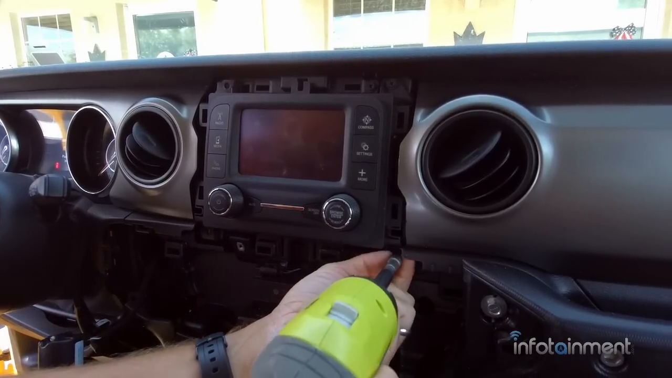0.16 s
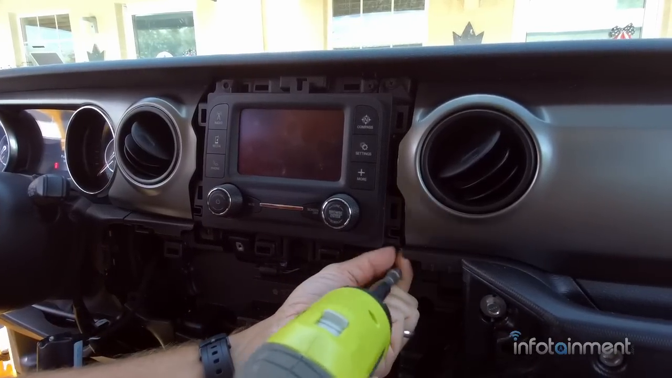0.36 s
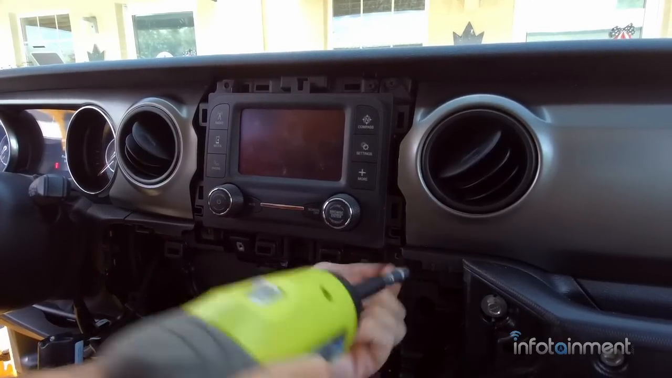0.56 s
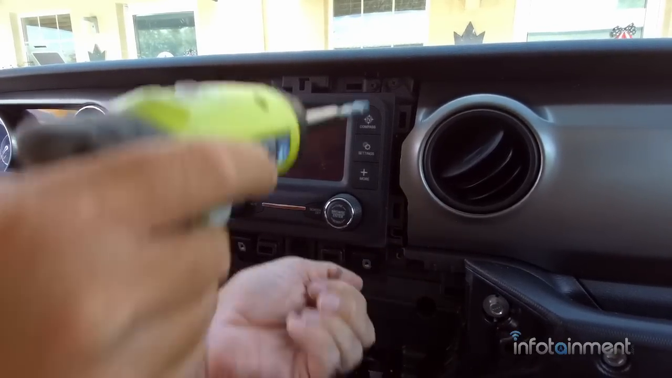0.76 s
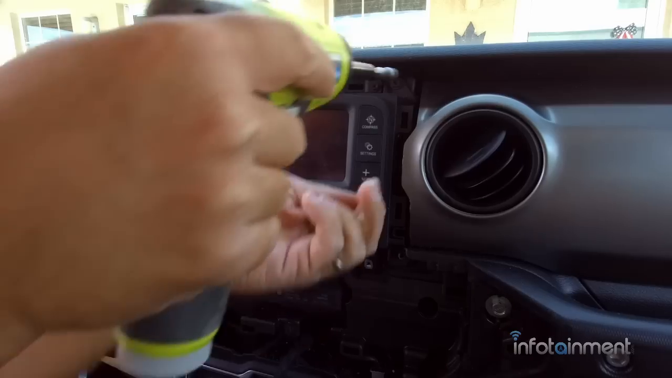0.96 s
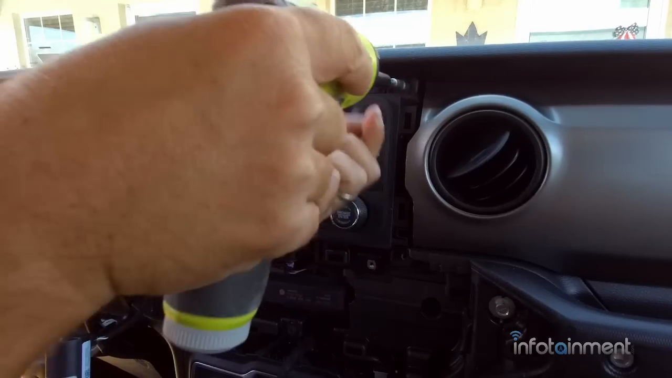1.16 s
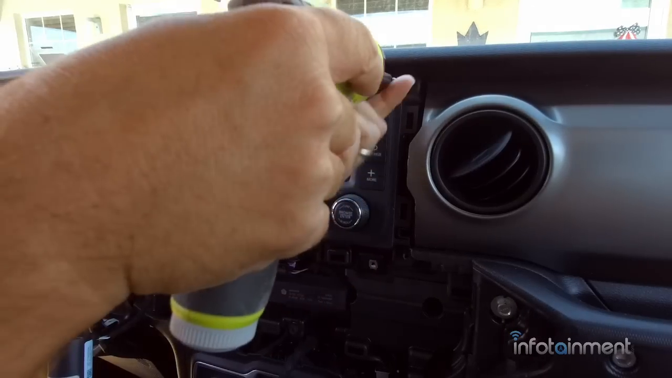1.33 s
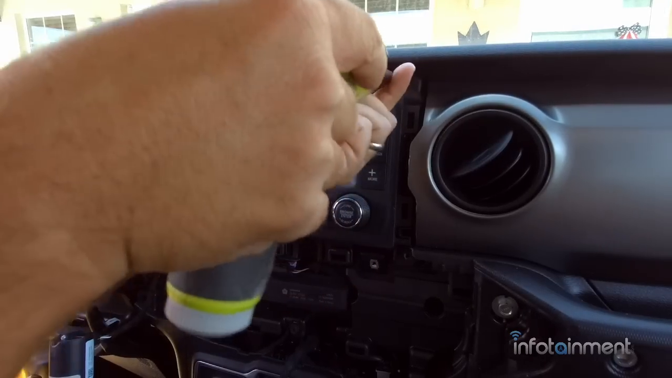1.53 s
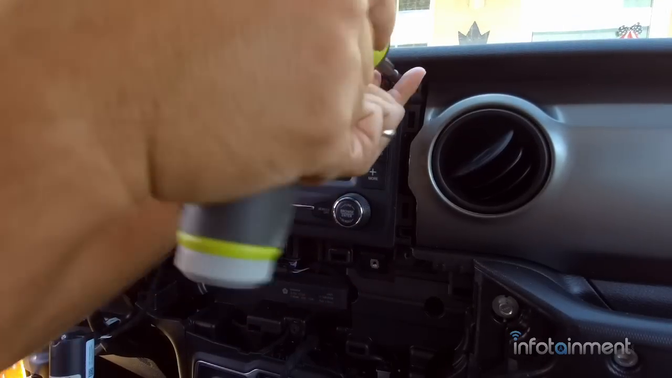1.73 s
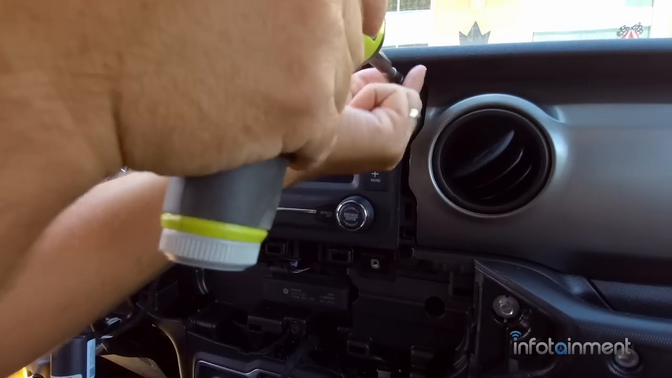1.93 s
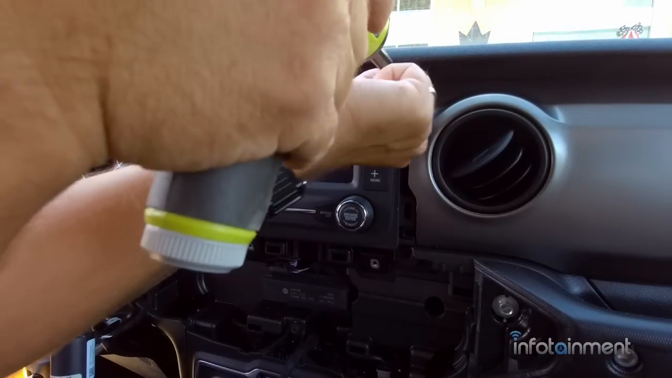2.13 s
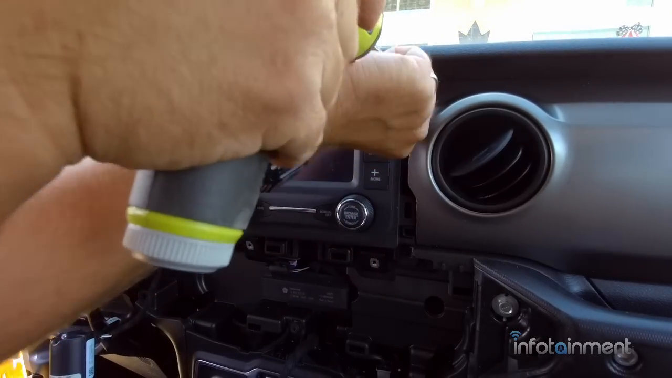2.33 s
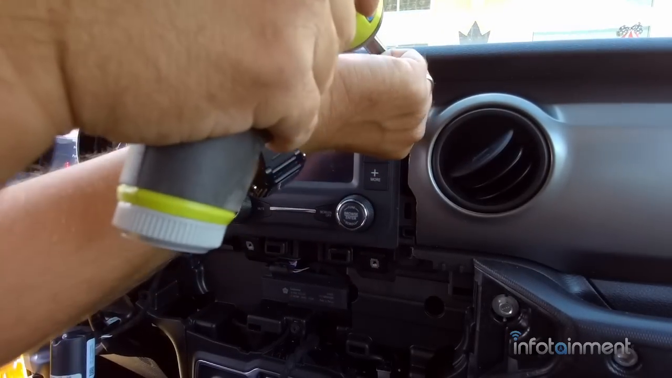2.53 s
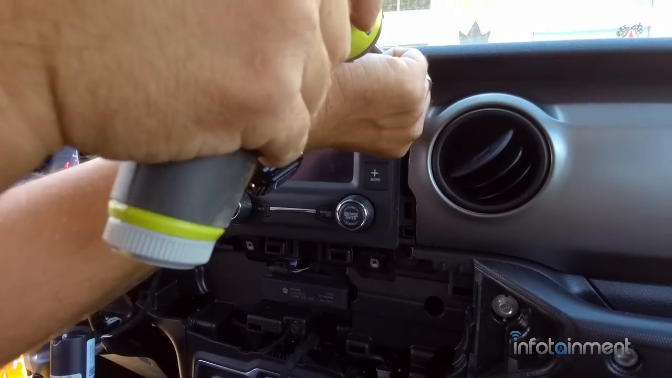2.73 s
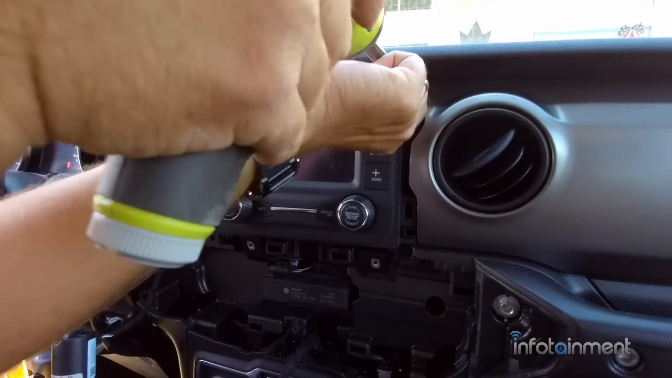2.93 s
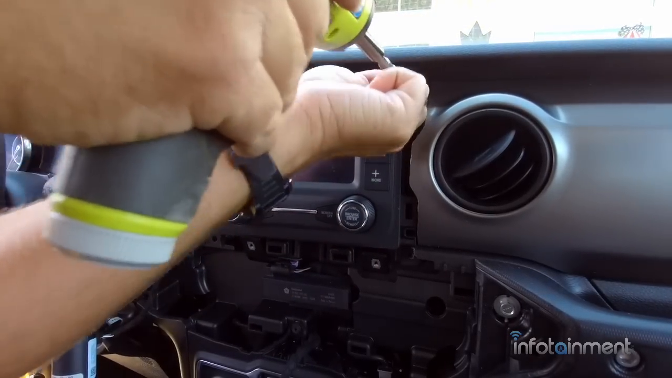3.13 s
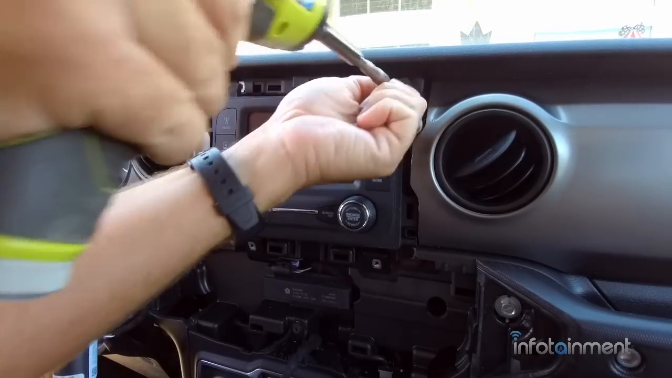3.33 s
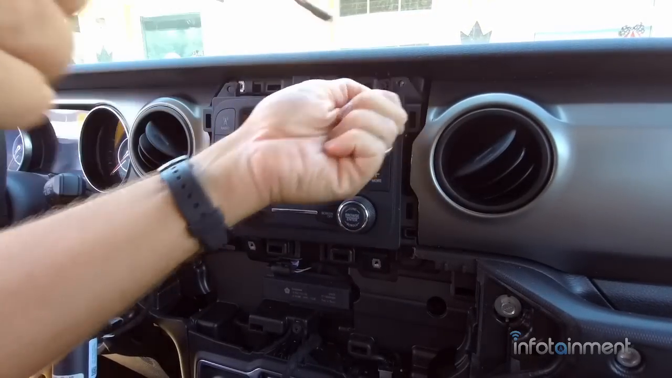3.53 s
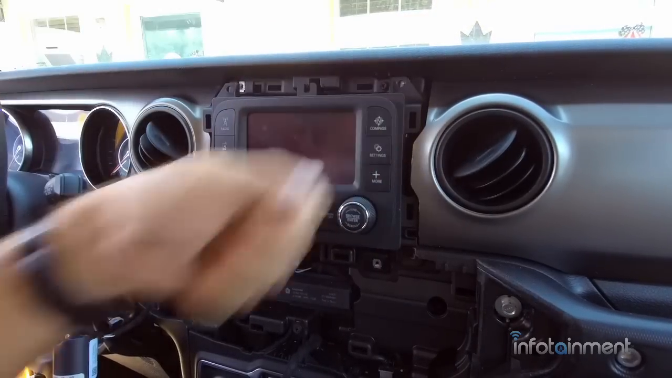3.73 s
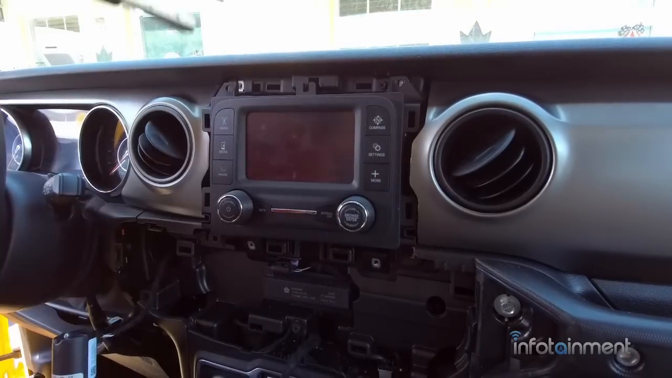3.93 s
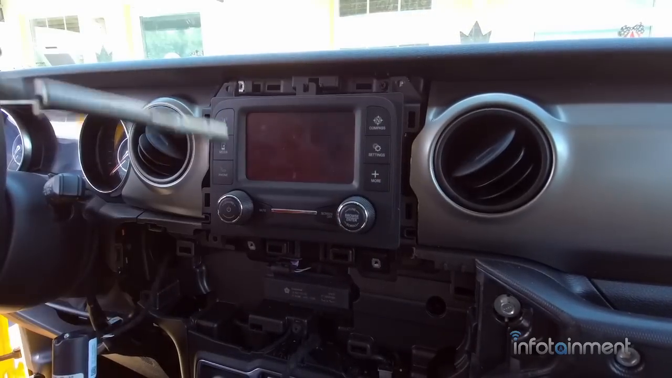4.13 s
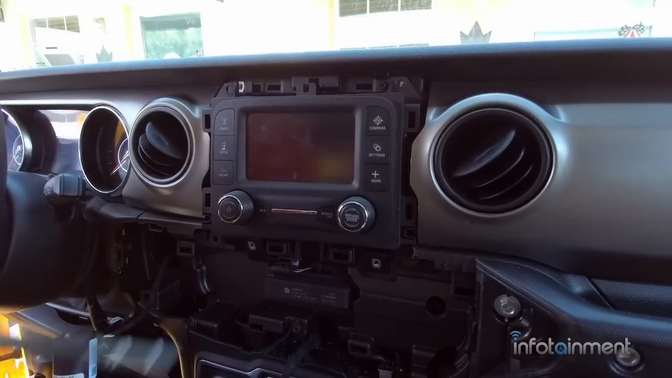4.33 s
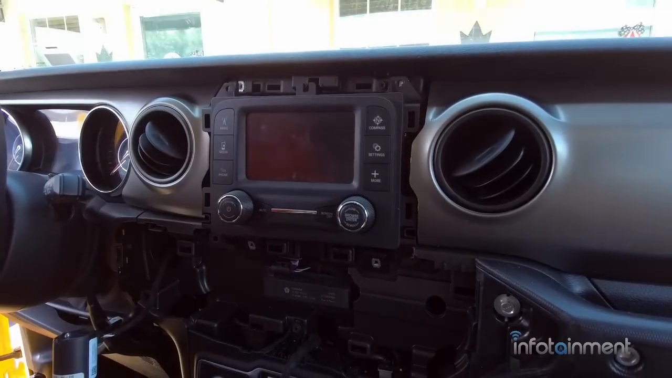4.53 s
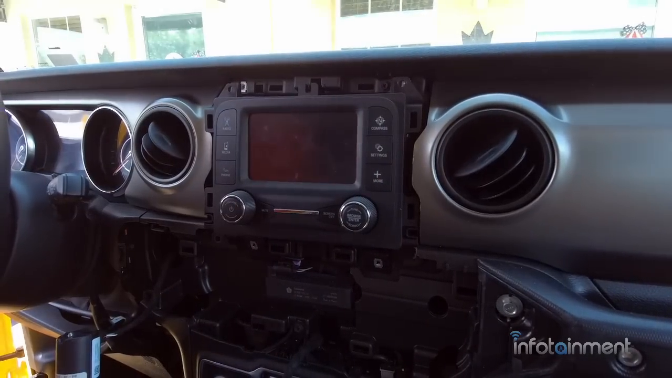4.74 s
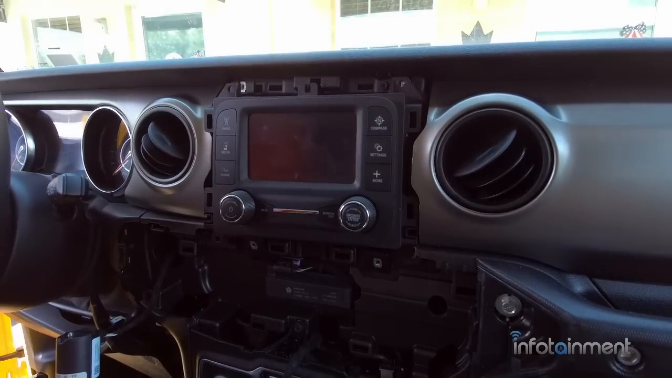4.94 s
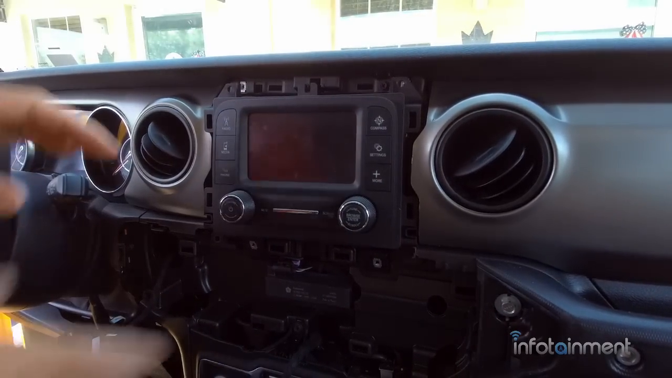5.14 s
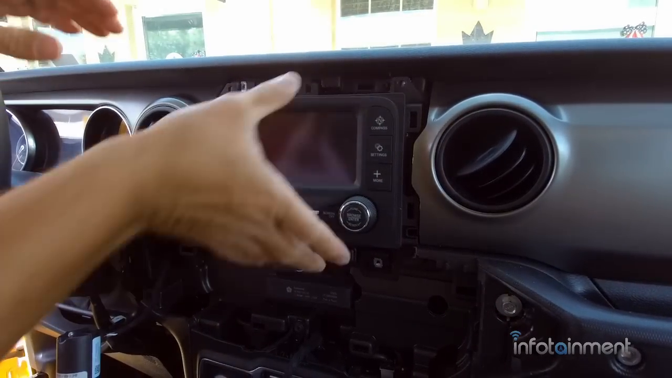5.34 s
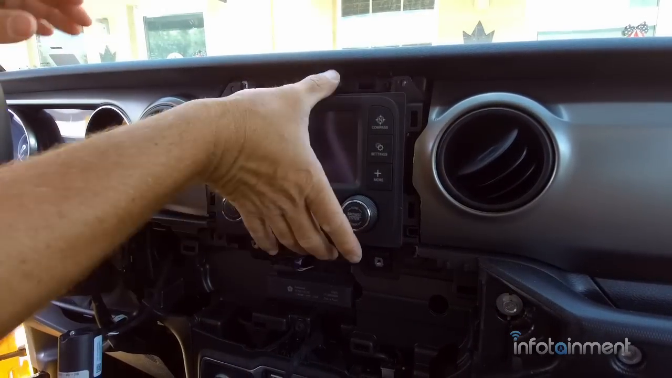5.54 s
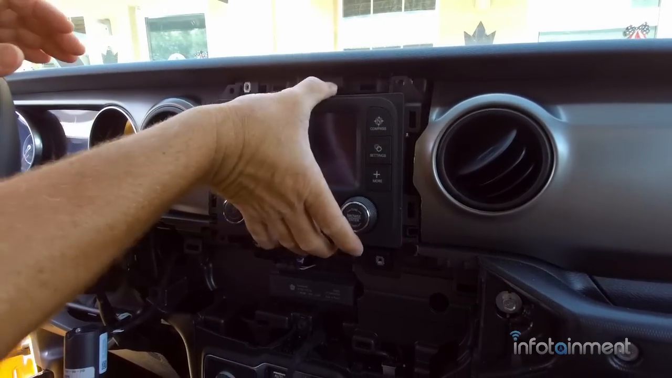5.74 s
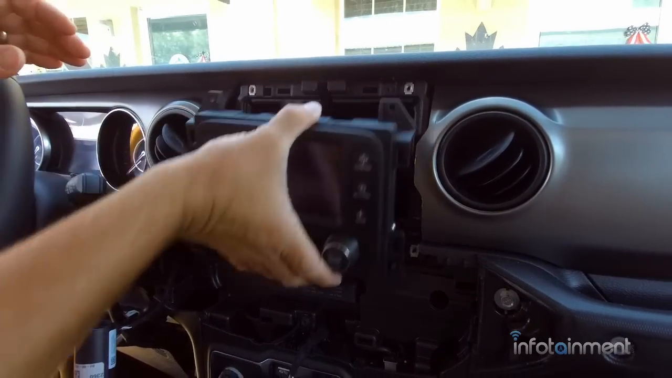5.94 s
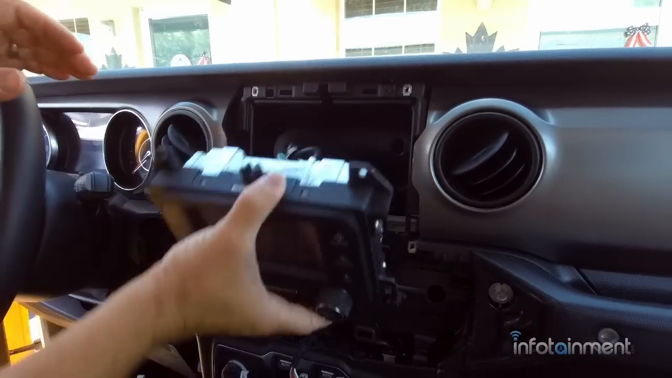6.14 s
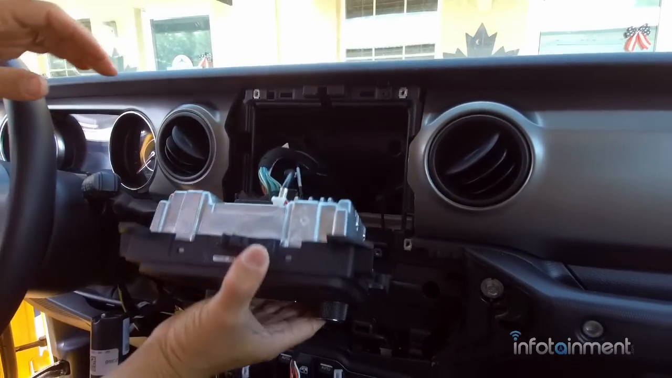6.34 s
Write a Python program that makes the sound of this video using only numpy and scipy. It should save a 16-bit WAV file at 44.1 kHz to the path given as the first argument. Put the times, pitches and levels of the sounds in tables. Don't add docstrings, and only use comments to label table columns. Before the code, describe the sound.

Two gritty bursts of a small electric screwdriver, sharp taps on a dashboard, loose screws bouncing in a plastic cup, then faint bumps and cloth rustle.

```python
import sys
import numpy as np
from scipy import signal
from scipy.fft import rfft, irfft
from scipy.io import wavfile

SR = 44100
rng = np.random.default_rng(int(sys.argv[2]) if len(sys.argv) > 2 else 0)


def materialize(psi):
    bounded = np.clip(np.atleast_2d(psi).T, -1, 1)
    quanta = np.round(bounded * 32767).astype(np.int16)
    wavfile.write(sys.argv[1], SR, quanta)


def boost_factor(decibels):
    exponent = np.asarray(decibels, float) / 20
    return 10 ** exponent


N = 281799


def evened(x):
    return x / np.sqrt(np.mean(x ** 2) + 1e-20)


def peaked(x):
    return x / abs(x).max()


def white(count):
    return rng.standard_normal(count)


def curves(rows):
    s, *columns = np.transpose(rows)
    t = np.arange(s[0], s[-1], 1 / SR)
    return [t] + [np.interp(t, s, c) for c in columns]


def add(mix, s, sound):
    part = mix[round(s * SR):][:len(sound)]
    part += sound[:len(part)]


def band(x, lo_hz, hi_hz):
    sos = signal.butter(3, [lo_hz, min(hi_hz, 16000)], "band", fs=SR, output="sos")
    return signal.sosfilt(sos, x)


def coloured(x, points, peaks=()):
    f, db = np.transpose(points)
    hz = np.fft.rfftfreq(len(x), 1 / SR)
    lift_db = sum(top_db / (1 + (2 * (hz - centre) / width) ** 2) for centre, width, top_db in peaks)
    base_db = np.interp(np.log(hz + 1), np.log(f), db, -90, -90)
    return evened(irfft(rfft(x) * boost_factor(base_db + lift_db), len(x)))


def drift(count, hz):
    return evened(signal.sosfilt(signal.butter(2, hz, fs=SR, output="sos"), white(count)))


def ramp(t, start, length):
    return np.clip((t - start) / length, 0, 1)


def hump(t, middle, length):
    return np.cos(np.pi * np.clip((t - middle) / length, -.5, .5)) ** 2


def ring(modes, factor=1, slower=1):
    t = np.arange(SR // 8) / SR
    x = np.zeros(len(t))
    for hz, db, t60 in modes:
        fade_db = -60 * t / (np.clip(t60, .02, .1) * slower)
        x += boost_factor(db + fade_db) * np.sin(2 * np.pi * hz * factor * t)
    return peaked(x)


def crack(lo_hz, hi_hz, t60, rise=0.0002):
    t = np.arange(SR // 8) / SR
    shape = np.minimum(t / rise, 1) ** 2 * boost_factor(-60 * np.maximum(t - rise, 0) / t60)
    return peaked(band(white(len(t)), lo_hz, hi_hz) * shape)


# pitch_hz, level_db
HUSH = [(18, -77), (30, -56), (60, -43), (100, -49), (125, -17.5), (202, -22.5), (230, -4), (270, -17.5),
        (467, -8.5), (505, -9.5), (709, -7), (767, -10), (1770, -16), (9430, -37), (15500, -33)]
# pitch_hz, width_hz, level_db
HUSH_BANDS = [(4500, 700, 5), (7900, 700, 4), (9450, 400, 4), (10800, 600, 3)]


def hush():
    return coloured(white(N), HUSH, HUSH_BANDS) * boost_factor(-60.5 + drift(N, 38))


# pitch_hz, level_db
HUM = [(236.9, -73), (463.0, -68.5), (543.7, -68)]


def outside_hum():
    mix = np.zeros(N)
    for hz, db in HUM:
        level = boost_factor(db - 3.5 + 3 * drift(N, 8))
        mix += level * np.sin(2 * np.pi * hz * np.cumsum(1 + 0.0057 * drift(N, 3.76)) / SR)
    return mix


# start_s, length_s, pitch_hz, level_db
SQUEAKS = [(3.825, .17, 9500, -78), (5.96, .09, 9500, -75), (4.65, 1.1, 2606, -79),
           (1.526, .026, 3200, -60), (3.89, .05, 6550, -77), (3.9, .05, 9550, -73)]


def squeaks():
    mix = np.zeros(N)
    for s, length, hz, db in SQUEAKS:
        count = len(np.arange(0, length, 1 / SR))
        waver = np.cumsum(1 + .004 * drift(count, 60)) / SR
        level = boost_factor(db + 3 * drift(count, 40)) * np.hanning(count) ** .5
        add(mix, s, level * np.sin(2 * np.pi * hz * waver))
    return mix


# peak_s, level_db
GRIPS = [(.3, -74.5), (1.24, -73), (1.58, -73), (1.815, -59), (2.08, -65.5), (2.38, -63), (2.55, -72),
         (2.78, -74), (3.2, -72), (4.16, -72), (4.4, -70), (5.71, -82)]


def grip_rumble():
    t = np.arange(N) / SR
    rumble_db = np.full(N, -95.0)
    for s, db in GRIPS:
        rumble_db = np.maximum(rumble_db, db - np.maximum(700 * (s - t), 60 * (t - s)))
    deep = [(25, -30), (45, -23), (63, -5), (90, -13), (140, -10.5), (280, -8)]  # Hz, dB
    return coloured(white(N), deep) * boost_factor(rumble_db)


# pitch_hz, level_db
RUSTLE = [(500, -30), (900, -8), (1300, -3), (2500, -3), (4900, -6), (9000, -12), (15500, -19)]
# middle_s, length_s, hiss_db, brush_db
SWEEPS = [(1.518, 0.36, -66, -62), (1.758, 0.32, -60, -81), (3.4, 0.9, -64, -75.5), (4.192, 0.31, -60, -63),
          (4.537, 0.22, -65, -51.5), (4.61, 0.073, -47, -71), (4.786, 0.58, -52.5, -61.5),
          (4.898, 0.12, -56, -59), (5.09, 0.51, -58.5, -63.5), (5.76, 0.24, -62.5, -64),
          (6.053, 0.71, -62, -64.5)]


def sleeve():
    t = np.arange(N) / SR
    hiss_power, brush_power = boost_factor(2 * -67.5), boost_factor(2 * -66.5)
    for s, length, hiss_db, brush_db in SWEEPS:
        swell = hump(t, s, length)
        hiss_power = hiss_power + boost_factor(2 * hiss_db) * swell
        brush_power = brush_power + boost_factor(2 * brush_db) * swell
    grains = white(N) * boost_factor(drift(N, 80))
    hiss = boost_factor(-6) * np.sqrt(hiss_power) * coloured(grains, RUSTLE)
    return hiss + np.sqrt(brush_power) * evened(band(grains, 295, 1280))


def reflections(x):
    at = np.arange(90, SR // 6, 20)
    taps = np.zeros(SR // 5)
    cabin_t60 = 0.069
    signs = rng.choice([-1., 1.], len(at))
    taps[at + rng.integers(0, 20, len(at))] = signs * boost_factor(-60 * at / SR / cabin_t60)
    return signal.oaconvolve(x, taps / np.linalg.norm(taps))[:N]


# start_s, peak_db, centre_hz
TICKS = [(1.059, -44.5, 9100), (1.0984, -55, 14000), (1.1662, -52, 8670), (3.155, -45.5, 6350),
         (3.1994, -61, 5380), (3.553, -55, 12000), (4.0232, -43, 9200), (4.0265, -54, 6800),
         (4.0538, -46, 7950), (4.0851, -56, 13500), (4.126, -46, 9400), (4.146, -50, 12000),
         (4.159, -44, 8450), (4.204, -57, 12000), (4.213, -46, 12000), (4.226, -52, 13500),
         (4.269, -44, 13000), (4.2877, -49, 11000), (4.292, -44.5, 8200), (4.3017, -53, 13500),
         (4.4024, -50, 9000)]


def loose_screws():
    mix = np.zeros(N)
    for s, db, hz in TICKS:
        add(mix, s, boost_factor(db) * crack(.5 * hz, 1.8 * hz, .014))
    return mix


# pitch_hz, level_db, t60_s
DASH = [
    [(265, -1, .09), (420, -4, .06), (590, -8, .05), (690, 0, .06), (850, -3, .05)],
    [(1050, -2, .05), (1260, 0, .045), (1520, -1, .045), (1800, -2, .04), (2080, -3, .04), (2500, -6, .04), (2990, -6, .045), (3420, -8, .04), (4300, -9, .04)],
]


def tap(s, db, thud_db, tick_db, t60, hz, rise):
    contacts = crack(400, 6000, .4 * t60, rise)[:1400]
    low, middle = (peaked(signal.oaconvolve(ring(modes, 1, t60 / 0.11), contacts)) for modes in DASH)
    middle = peaked(middle + 1.4 * band(middle, .7 * hz, 1.4 * hz))
    add(middle, 0, 0.4 * crack(0.41 * hz, 2.57 * hz, t60, rise))
    add(middle, 0, 1.6 * boost_factor(tick_db) * crack(4200, 10500, .6 * t60, .25 * rise))
    add(middle, 0, .7 * boost_factor(tick_db) * crack(10000, 16000, .25 * t60, .25 * rise))
    add(low, 0, 0.62 * crack(380, 1600, t60, rise) + .14 * crack(220, 490, 1.6 * t60, 0.0022))
    return s, boost_factor(db - 3.5) * (middle + 1.03 * boost_factor(thud_db) * low)


# start_s, peak_db, thud_below_db, t60_s, centre_hz
SCUFFS = [(1.3747, -45.5, -8.5, 0.12, 1510), (1.45, -38.5, -14, 0.06, 1300), (1.522, -34, -5, 0.12, 1030),
          (1.6344, -42.5, -11, 0.067, 1540), (3.6094, -46, -2, 0.16, 1080), (3.907, -50.5, 4, 0.12, 1640),
          (4.8244, -47, 0, 0.085, 2050), (4.9138, -38, -17, .069, 2020), (5.7344, -44.5, -10, 0.23, 1920)]


def scuffs():
    mix = np.zeros(N)
    for s, db, thud_db, t60, hz in SCUFFS:
        add(mix, *tap(s, db, thud_db, -32, t60, hz, 0.0069))
    return mix


# start_s, peak_db, thud_below_db, tick_below_db, centre_hz
CATCHES = [(1.781, -35, -21, -17, 1970), (2.365, -26, -4, -15, 1000), (2.405, -30, -15, -16, 1110),
           (2.5, -34, 0, -16, 1110), (2.544, -21.5, -8, -22, 1290), (2.585, -25, -28, -14, 1300),
           (2.612, -21, -21, -20, 1520), (2.635, -23, -13, -30, 1300), (2.748, -24, -3, -19, 1250)]
# start_s, peak_db, thud_below_db, tick_below_db, centre_hz
SEATS = [(0.874, -43.5, -5, -7, 1240), (1.565, -37, 4.5, -15, 1350), (1.714, -34.5, -7, -3.5, 1370),
         (1.494, -25, -26, -22, 1400), (1.742, -40, -21, -12, 1310), (3.02, -39, -21, -4, 2620),
         (3.0866, -44, -10, -15, 1100), (3.39, -45.5, -7, -11, 1540)]
# start_s, peak_db, thud_below_db, tick_below_db, centre_hz
BUMPS = [(4.8775, -40, -10, -17, 1480), (4.9874, -44, -15, -23, 2300), (5.074, -37, -12, -16, 1500),
         (5.976, -51, 5, -20, 900)]


def taps():
    mix = np.zeros(N)
    for t60, rise, table in ((.085, .0063, CATCHES), (.06, .0016, SEATS), (.039, .0016, BUMPS)):
        for s, db, thud_db, tick_db, hz in table:
            longer_t60 = max(t60 + 0.3 * (db + 13.5), .02)
            add(mix, *tap(s, db, thud_db, tick_db, longer_t60, hz, rise))
    return mix


# start_s, peak_db, swell_s, t60_s, tick_below_db
STRIKES = [(.268, -23, 0.0045, 0.039, -16), (1.2383, -26, 0.0015, 0.042, -40),
           (1.473, -15.5, 0.0024, 0.043, -17.5), (1.541, -26.5, .011, 0.027, -38),
           (1.803, -9.5, 0.0037, 0.049, -14), (2.0382, -11, 0.0029, 0.048, -10),
           (4.1429, -35.5, 0.0079, 0.044, -30), (4.158, -36, 0.0033, 0.027, -24),
           (4.261, -35.5, 0.002, 0.023, -20), (4.922, -32.5, 0.0075, 0.028, -25),
           (4.968, -39, 0.0078, 0.051, -30), (5.0374, -32, 0.0017, 0.028, -13),
           (5.0609, -29, 0.00091, 0.027, -14), (6.0077, -47, .002, 0.086, -12)]
# pitch_hz, level_db
DASH_SPOTS = [
    [(750, -2.5), (1300, -4), (1800, -3), (2130, -9), (3200, -21), (4150, -3)],
    [(415, -7.5), (590, -3.5), (840, -5), (1060, -4), (1270, 2), (1480, -2.5), (1950, -8), (2520, -10),
     (3070, -11), (3400, -22)],
    [(420, -16.5), (640, -10), (1050, -4.5), (1280, 1.5), (1510, -3.5), (1950, -7.5), (2500, -14),
     (3070, -14), (3590, -12), (4240, -20), (5570, -28)],
    [(690, -8), (1060, -1), (1280, 2.5), (1730, -11), (1940, -9), (2560, -25), (3120, -25), (3820, -24)],
    [(270, -19), (420, -15.5), (680, -5), (1000, -11.5), (1270, -2.5), (1520, 1), (1780, 1), (2080, 0),
     (2480, -6), (3020, -6.5), (4160, -3), (5090, -13)],
    [(410, -9), (580, -5.5), (1060, -8), (1300, -0.5), (1530, 1.5), (1830, -1), (2260, -5), (2500, -3.5),
     (2990, -1), (3290, -1), (3700, -2), (4570, -17)],
]
# pitch_hz, level_db
CONSOLE_SPOTS = [
    [(300, 1), (520, 1), (760, 2), (950, -12)],
    [(270, -3), (480, -10), (710, 1), (1200, -10), (2400, -12)],
    [(350, -1), (480, -6), (760, 7), (1020, -1)],
    [(960, -7), (1500, -10), (1810, -17), (2050, 1), (2700, -14), (3610, -9)],
    [(900, -4), (1550, 0), (2000, -5), (2400, -1), (3300, -18)],
    [(900, -10), (1500, 4), (2000, -6), (2600, -15), (3300, -16)],
    [(470, -10), (850, -5), (1430, 3.5), (1700, 0), (2200, -14), (3190, -23), (4760, -16)],
    [(600, -1), (1620, -6), (1900, -7), (3100, -18)],
]


def strike(s, db, rise, t60, tick_db, modes):
    hz, mode_db = np.transpose(modes)[:, :, None]
    t = np.arange(SR // 8) / SR
    hold_s = 0.0019
    mode_t60 = t60 * (1500 / hz) ** 0.47
    fade_db = -60 * np.maximum(t - rise - hold_s, 0) / mode_t60
    body = (boost_factor(mode_db + fade_db) * np.sin(2 * np.pi * (hz * t + rng.random(hz.shape)))).sum(0)
    body *= np.minimum(t / rise, 1) ** 3.2 / np.linalg.norm(boost_factor(mode_db)) / 1.815
    body += boost_factor(-5) * crack(0.75 * hz.min(), 1.16 * hz.max(), t60, rise)
    tick = 0.98 * crack(4000, 9500, 0.62 * t60, .4 * rise) + 0.67 * crack(9900, 17000, t60, 0.44 * rise)
    return s, boost_factor(db) * (body + boost_factor(tick_db) * tick)


def hard_blows():
    mix = np.zeros(N)
    for row, modes in zip(STRIKES, DASH_SPOTS + CONSOLE_SPOTS):
        add(mix, *strike(*row, modes))
    return mix


# start_s, peak_db, tick_below_db
CLINKS = [(4.159, -60, -2), (4.32, -38, -9), (4.326, -14, -17), (4.3305, -27, -16), (4.339, -33, -21),
          (4.3534, -14, -13), (4.364, -23, -18), (4.3775, -17.5, -10), (4.382, -28, -8),
          (4.4162, -29.5, -16), (4.4255, -23, -17), (4.447, -28.5, -22), (4.451, -32, -15),
          (4.4695, -39, -9), (4.492, -33.5, -23), (4.508, -39, -28), (4.5271, -42, -20),
          (4.5441, -36.5, -29), (4.5683, -30, -20), (4.618, -50, -12)]
# pitch_hz, level_db, t60_s
SCREW = [(1650, 2, 0.097), (2390, 19, 0.011), (2920, -9, 0.057), (3350, -25, 0.034), (4940, 2, 0.054),
         (5740, -39, 0.079), (6300, -28, 0.048), (6900, -28, 0.047)]


def clinks():
    mix = np.zeros(N)
    for s, db, tick_db in CLINKS:
        steel = .6 * ring(SCREW, rng.uniform(.93, 1.07), .5)
        steel += .8 * crack(2000, 3400, .03, .0004) + .55 * crack(1500, 6500, .045, .0004)
        add(mix, s, boost_factor(db) * (0.5 * steel + boost_factor(tick_db - 3.5) * crack(3400, 19000, 0.02)))
    return mix


# start_s, peak_db, pitch_factor
KNOCKS = [(4.327, -31, 0.9), (4.339, -27.5, 0.8), (4.354, -22, 1), (4.3604, -8.5, 0.97),
          (4.3769, -5.5, 0.96), (4.392, -23, 0.75), (4.416, -12.5, 0.96), (4.424, -24, 0.93),
          (4.43, -9, 0.99), (4.445, -43, 0.74), (4.455, -23, 0.95), (4.469, -29, 0.88), (4.493, -32, 0.97),
          (4.51, -35, 0.86), (4.545, -34, 0.91), (4.569, -31.5, 0.91), (4.619, -38, 0.84),
          (4.645, -51, 0.9)]
# pitch_hz, level_db, t60_s
CUP = [(450, 8, 0.11), (694, -8, 0.065), (766, -1.5, 0.12), (854, -3, 0.07), (911, 4, 0.043),
       (953, -0.5, 0.095), (1027, -9, 0.045), (1080, 1.5, 0.073), (1120, -14, 0.044)]


def cup_knocks():
    mix = np.zeros(N)
    for s, db, factor in KNOCKS:
        flex = np.hanning(170) * np.sin(2 * np.pi * 930 * factor * np.arange(170) / SR)
        body = peaked(np.convolve(ring(CUP, factor, 0.63), flex))
        add(body, 0, 0.034 * crack(286, 520, 0.35, 0.0021))
        add(body, 0, 0.097 * crack(1000, 1920, .07, 0.00079))
        add(mix, s, boost_factor(db - .9) * body)
    return mix


# start_s, peak_db, ring_hz
RATTLES = [(.187, -30, 2250), (.3321, -25, 2160), (.435, -25.5, 1805), (.5, -30, 1800), (.5137, -31, 2220),
           (.548, -29.5, 2040), (.585, -25, 2220), (.622, -25, 2110), (.631, -27, 2870), (.628, -34, 4700),
           (.695, -40, 3700), (.6629, -35, 2250), (.6814, -31, 2100), (.6968, -30.5, 2460)]


def shell_rattles():
    mix = np.zeros(N)
    for s, db, hz in RATTLES:
        spot = crack(.96 * hz, 1.04 * hz, 0.063, 0.002)
        add(mix, s, boost_factor(db - 7.5) * (spot + 0.51 * crack(1000, 7000, .03, 0.0024)))
    return mix


def speed(t, pressed, released, top_hz, drag_hz):
    rising = 1 - np.exp(-(np.maximum(t - pressed, 1e-3) / .036) ** .6)
    coasting = np.exp(-np.maximum(t - released, 0) / .77)
    return np.maximum((top_hz * rising + drag_hz) * coasting - drag_hz, 60)


# whine_db, octave_db, grind_above_chatter_db, fizz_db
VOICES = [(-55, -55.5, -10, -39), (-49.5, -47.5, -6, -46.5)]
# whine_db_per_decade, octave_db_per_decade, grind_freed_db
COASTING = [(58, 46, -8), (120, 80, 0)]
# start_s, level_db
LOAD_OFF = [(9, 0), (2.38, -5)]
# end_s, level_db
SEATED = [(0, 0), (2.05, 0)]
FREED_DB = [6, 0]
# whine_multiple, below_octave_db
SIDE_ORDERS = [(1.77, -11), (2.17, -7), (2.67, -12), (2.98, -13), (4.05, -13), (5.2, -14), (6.25, -11),
               (6.58, -11), (7.6, -13)]


def motor_whine(i, t, turns, slowed, faded, released):
    bite_s, unseated_db = SEATED[i]
    free_s, unloaded_db = LOAD_OFF[i]
    tone_db = VOICES[i][0] + COASTING[i][0] * slowed + unseated_db * np.clip((bite_s - t) / 0.025, 0, 1)
    octave_db = VOICES[i][1] + COASTING[i][1] * faded + unloaded_db * ramp(t, free_s, 0.064)
    tones = boost_factor(tone_db) * np.sin(2 * np.pi * turns) + boost_factor(octave_db) * np.sin(4 * np.pi * turns)
    for multiple, db in SIDE_ORDERS:
        tones += boost_factor(octave_db + db + 4.5 * drift(len(t), 6.9)) * np.sin(2 * np.pi * multiple * turns)
    return tones * np.sqrt(2) * boost_factor(1.6 * drift(len(t), 25) + FREED_DB[i] * ramp(t, released, .04))


# pitch_hz, level_db
HOUSING = [
    [(710, -14), (1200, -7), (1600, -4), (1770, -0.5), (2040, 0), (2210, -0.5), (3620, -3.5), (4160, -1.5),
     (6370, -6.5), (9220, -18.5), (11000, -14), (14300, -16), (22000, -120)],
    [(710, -30), (1200, -8), (1600, -5), (1720, -16), (2000, -9.5), (2640, -1), (3180, -2), (5140, -4),
     (6190, -9), (6730, -9.5), (11000, -18), (14300, -33), (22000, -120)],
]
# pitch_hz, width_hz, level_db
SHELL = [
    [(1810, 33, 5.5), (990, 63, -1), (1337, 47, 7), (2090, 60, -4), (2100, 65, 1), (2193, 60, 4.5),
     (3140, 130, 4.5), (3450, 80, 4), (3540, 150, -3), (3940, 80, -1), (4100, 160, -0.5), (5200, 100, -6),
     (5430, 150, 2.5), (6540, 250, 4)],
    [(1300, 74, 5), (1845, 330, 7), (1960, 63, -3), (2300, 63, 6.5), (2540, 60, -1.5), (2630, 48, 2),
     (2720, 87, 1), (3010, 90, -3), (3460, 110, 2), (4370, 180, 2), (4900, 100, 1.5), (5490, 120, 9),
     (5520, 90, -12), (6900, 380, 5.5)],
]


def gear_teeth(i, hz, turns, slowed, carrier):
    count = len(hz)
    hits = rng.random(count) < 9.0 * (hz + 60) / SR
    impacts = hits * boost_factor(2.2 * rng.exponential(1, count)) * rng.choice([-1, 1], count)
    teeth = coloured(evened(impacts) + 0.78 * white(count), HOUSING[i], SHELL[i])
    shaft = np.cos(2 * np.pi * turns / 3)
    return teeth * boost_factor(0.093 * carrier + shaft + (1.04 - 1.2 * slowed) * drift(count, 42))


# pitch_hz, level_db
GRIND = [(71, -63), (120, -27.5), (367, -9.5), (399, -9), (523, -6), (837, 0.5), (931, -3), (1100, -1.5),
         (1290, -5.5), (2000, -2.5), (2600, -12), (4400, -120)]


def thread_grind(i, t, gear_db, released):
    loudest_db = gear_db.max()
    level_db = VOICES[i][2] + loudest_db + 0.72 * (gear_db - loudest_db)
    level_db += COASTING[i][2] * ramp(t, released, 0.086)
    grind = coloured(white(len(t)), GRIND, SHELL[i]) * boost_factor(2.1 * drift(len(t), 50))
    return boost_factor(level_db - 0.5) * grind


# pitch_hz, level_db
FIZZ = [
    [(5000, 2), (8500, -1.5), (9330, -7.5), (10600, -6.5), (13000, -1.5), (14500, 4), (15500, -3)],
    [(5000, -5), (8500, -4.5), (9330, -5.5), (11000, -7), (13000, -2), (14500, 2.5), (15500, -3)],
]


def brush_fizz(i, gear_db, faded, carrier):
    count = len(gear_db)
    level_db = np.minimum(VOICES[i][3] + 45 * faded, gear_db)
    fizz = coloured(white(count), FIZZ[i]) * boost_factor(1.6 * carrier + 2.4 * drift(count, 60))
    return boost_factor(level_db + 1) * fizz


# pressed_s, released_s, free_speed_hz, dry_drag_hz
RUNS = [
    (-1, .366, 857, 660),
    (1.78, 2.63, 858, 740),
]
# time_s, level_db
CHATTER = [
    [(0, -36.5), (.42, -35), (.5, -40), (.67, -39), (.73, -43), (.81, -48), (.86, -61), (.93, -79)],
    [(1.779, -38), (1.83, -38.5), (1.95, -35.5), (2.25, -38.5), (2.65, -37), (2.88, -43), (2.95, -46.5),
     (3.02, -70)],
]


def screwdriver():
    mix = np.zeros(N)
    for i, run in enumerate(RUNS):
        released = run[1]
        t, gear_db = curves(CHATTER[i])
        hz = speed(t, *run)
        slowed = np.log10(hz / hz.max())
        faded = slowed * np.where(t > released, 1, 0.29)
        turns = np.cumsum(hz * (1 + .0032 * drift(len(t), 30))) / SR
        carrier = np.cos(2 * np.pi * turns / 35 + .9 * drift(len(t), 6))
        sound = motor_whine(i, t, turns, slowed, faded, released)
        sound += boost_factor(gear_db - 1) * gear_teeth(i, hz, turns, slowed, carrier)
        sound += thread_grind(i, t, gear_db, released) + brush_fizz(i, gear_db, faded, carrier)
        add(mix, t[0], sound)
    return mix


def scene():
    cabin = hush() + outside_hum() + squeaks() + grip_rumble() + sleeve()
    blows = loose_screws() + scuffs() + taps() + hard_blows()
    blows += clinks() + cup_knocks() + shell_rattles()
    blows = band(blows, 203, 23000)
    tool = screwdriver()
    heard = tool + blows + boost_factor(-8.5) * reflections(blows + .55 * tool) + cabin
    return np.array([2 * heard, 0 * heard])


def top_cut(x):
    return signal.sosfilt(signal.butter(12, 16530, fs=SR, output="sos"), x)


def record(dry):
    limited = signal.oaconvolve(dry, signal.firwin(301, 15300, fs=SR)[None], "same")
    return top_cut(limited)


dry = scene()
out = record(dry)
materialize(out)
```